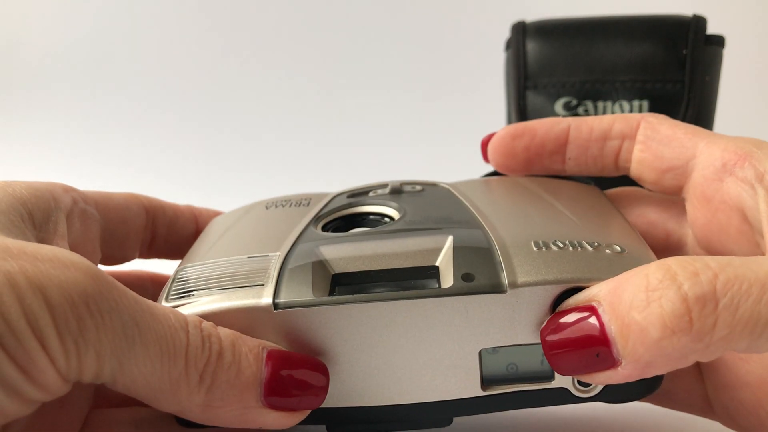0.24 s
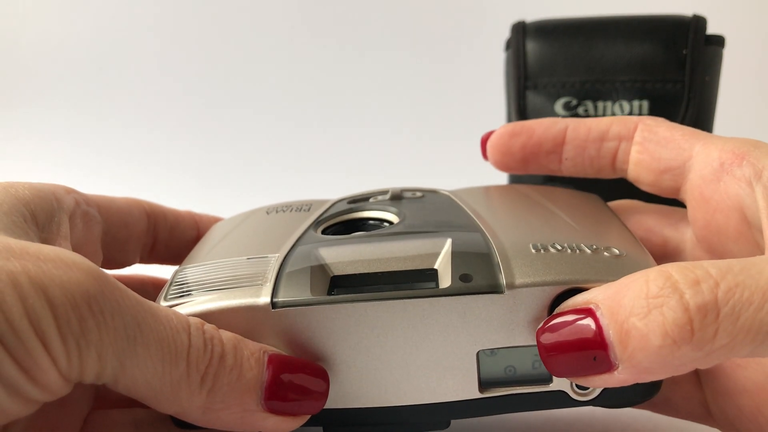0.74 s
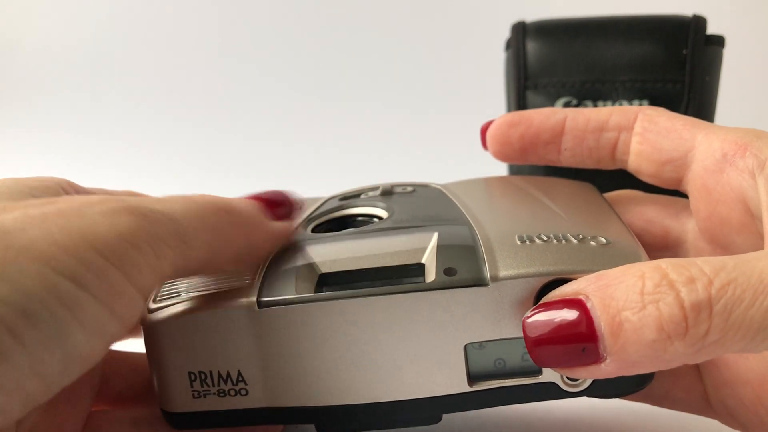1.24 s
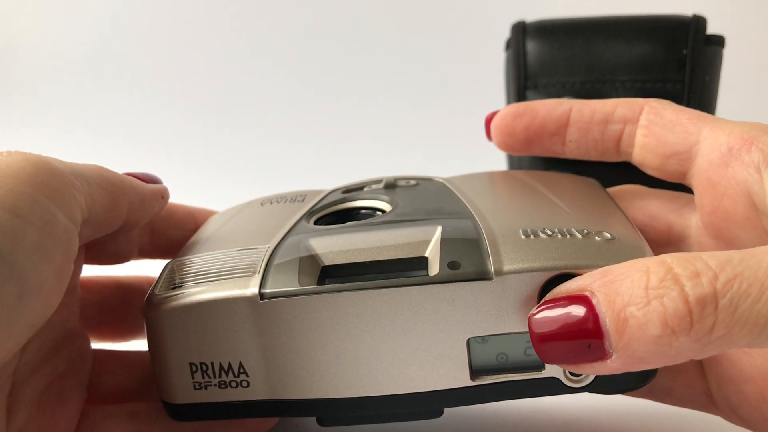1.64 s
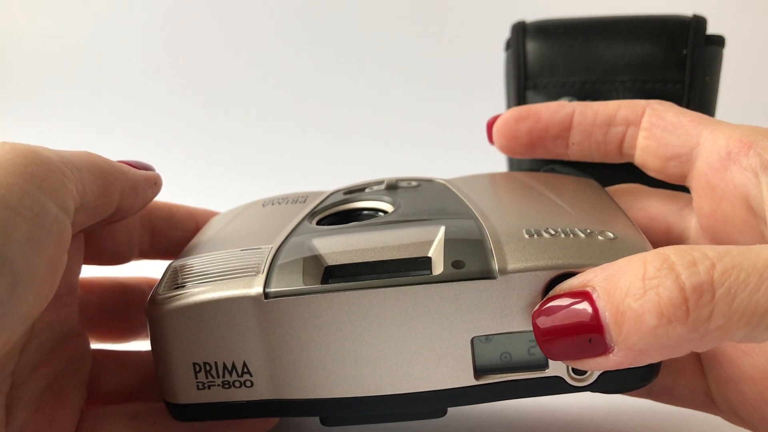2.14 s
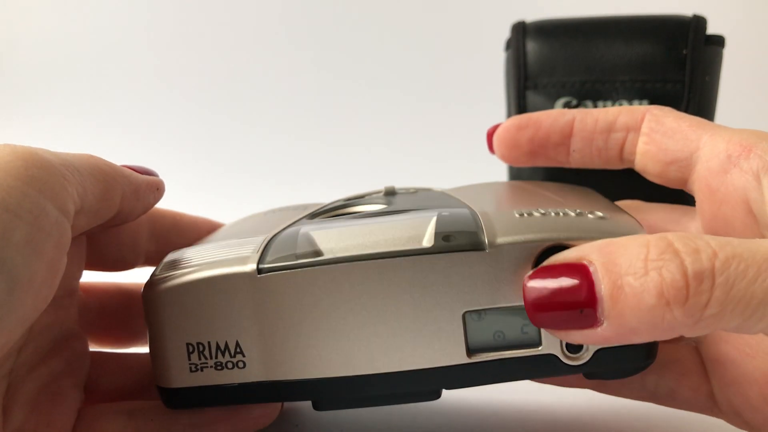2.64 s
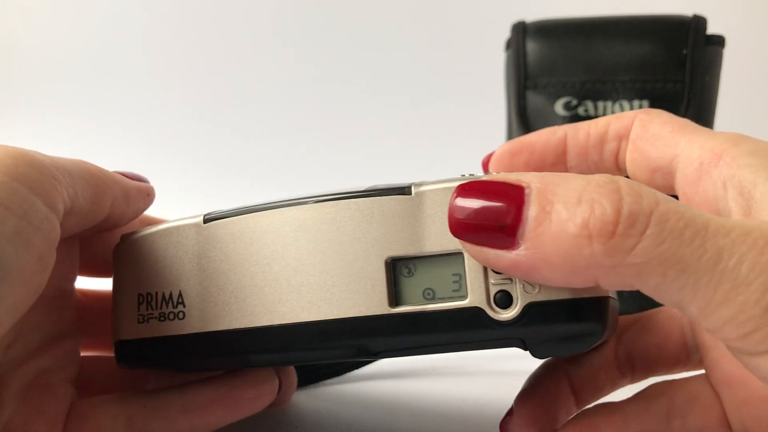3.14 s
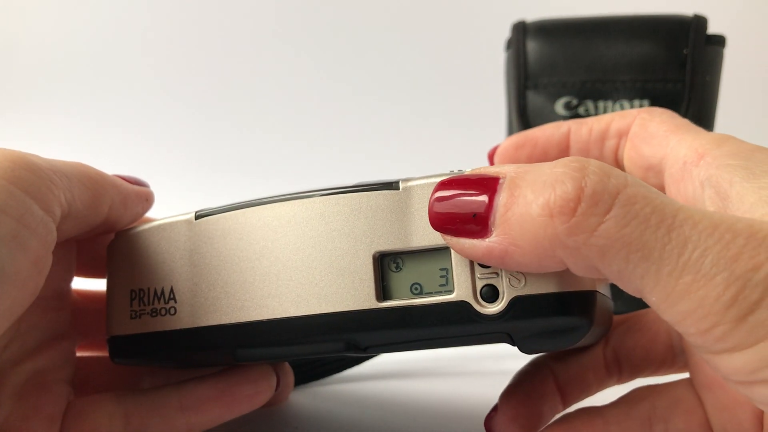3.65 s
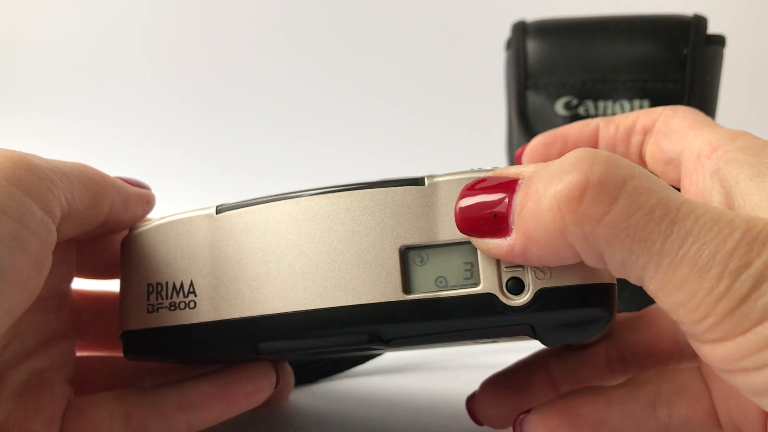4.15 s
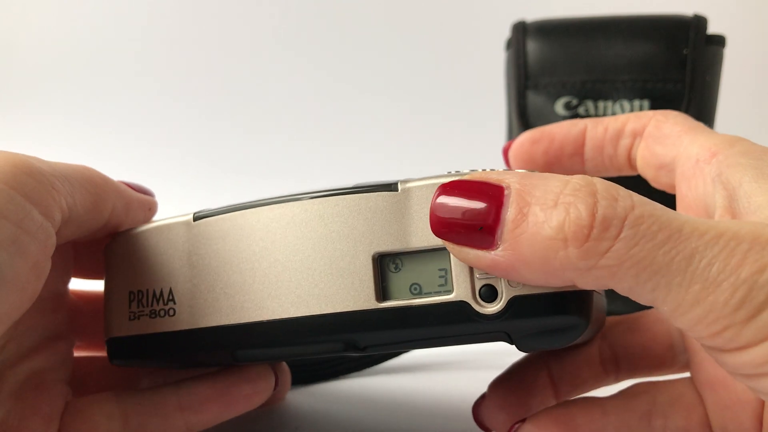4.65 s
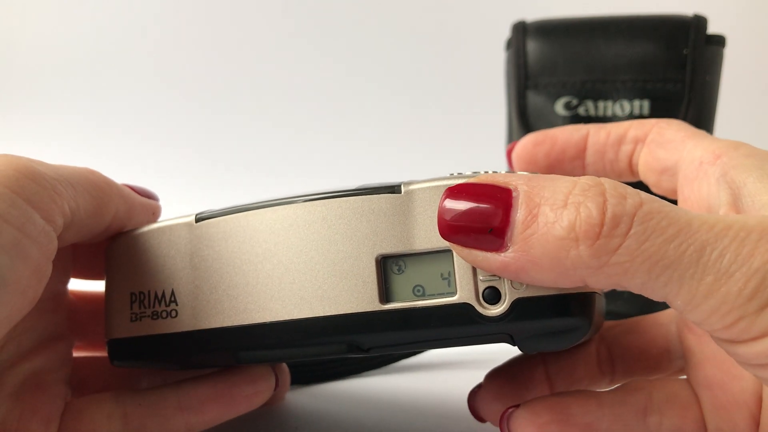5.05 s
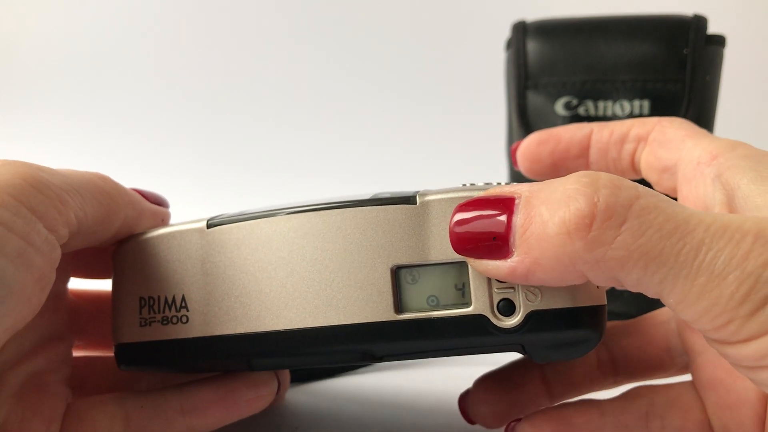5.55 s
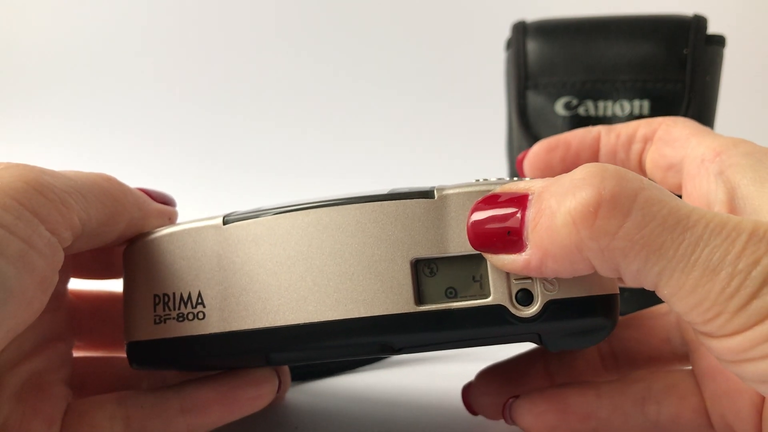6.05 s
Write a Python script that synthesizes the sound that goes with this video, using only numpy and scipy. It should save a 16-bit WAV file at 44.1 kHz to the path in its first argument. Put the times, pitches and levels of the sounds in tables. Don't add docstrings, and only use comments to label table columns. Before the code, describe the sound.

Close-miked handling of a small plastic film camera in a quiet room with a faint short echo. At 0.17 s the shutter snaps, a hard double click about 35 ms apart; from 0.33 to 0.83 s a small geared motor whirs, buzzy and fizzy with a whine around 2.4 kHz, then brakes abruptly. Light taps and a quick finger rub come at 1.05-1.4 s, over very faint thin ticking about ten times a second. The second shot is at 2.49 s, its clearer whine running 2.64-3.15 s, ending in a tight scrape and faint metallic ring. A soft slide follows near 3.3 s. A button tap at 4.23 s precedes the third shot at 4.31 s, winding 4.44-4.95 s. More ticking, taps at 5.62 and 6.01 s, then the last shot at 6.09 s and a duller whir from 6.24 s, cut short. Low room rumble, distant hums and hiss continue throughout.

```python
import sys
import numpy as np
from scipy import signal
from scipy.fft import rfft, irfft, next_fast_len
from scipy.io import wavfile
from scipy.ndimage import map_coordinates

SR = 44100
rng = np.random.default_rng(int(sys.argv[2]) if len(sys.argv) > 2 else 0)


def nominal_scale(level):
    x = np.asarray(level, float) / 20
    return 10 ** x


def wrap_up_sound(samples):
    columns = np.atleast_2d(samples).T
    tamed = np.clip(columns, -1, 1)
    steps = np.round(tamed * 32767).astype(np.int16)
    wavfile.write(sys.argv[1], SR, steps)


N = 277389
T = np.arange(N) / SR

# [f/Hz, level per Hz/dB]
FIZZ_COLOURS = [
    [(4000, -44), (6800, -2.5), (8110, -8), (9050, -4.5), (10100, -10.5), (11100, -6.5), (11700, -2),
     (12300, 5.5), (13400, -4.5), (15100, -1.5), (15800, -15)],
    [(4000, -29), (6800, -9.5), (7590, -8.5), (8230, -8.5), (8490, -2.5), (8990, -1), (10100, -8.5),
     (10900, -5.5), (11600, -8), (12600, 2), (14000, -2), (15000, -3.5), (15800, -15)],
    [(4000, -45.5), (6800, -1), (7560, 1.5), (8430, -3), (9640, 1.5), (10300, -4.5), (11100, 7), (11700, 1),
     (11900, -2.5), (13200, 8.5), (14000, 7.5), (15000, 9.5), (15800, -9)],
    [(4000, -29), (6800, -3), (8050, -5), (10300, -6), (10900, -2), (14200, -0.5), (15800, -2)],
]
# [f/Hz, level per Hz/dB]
SNAP_COLOUR = [(2940, -37.5), (5000, -3), (5400, 1), (6940, 1.5), (7820, 1), (8490, 6), (10800, 0),
               (12700, 2), (14200, 7.5), (15800, -7.5)]


def unit(x):
    return x / np.sqrt(np.mean(x ** 2) + 1e-20)


def along(points, hz):
    f, v = np.transpose(points)
    return np.interp(np.log(hz + 1), np.log(f + 1), v)


def wobble(rate, t=T):
    return map_coordinates(rng.standard_normal(int(t[-1] * rate) + 4), [t * rate])


def coloured(x, spectrum):
    gain = nominal_scale(along(spectrum, np.fft.rfftfreq(4096, 1 / SR)))
    cepstrum = irfft(np.log(gain + 1e-6))
    cepstrum[1:2048] *= 2
    cepstrum[2049:] = 0
    response = irfft(np.exp(rfft(cepstrum)))
    return signal.fftconvolve(x, response / np.linalg.norm(response))[:len(x)]


def noise(spectrum):
    return unit(coloured(rng.standard_normal(N), spectrum))


def resonant(x, hz, width):
    return signal.lfilter(*signal.iirpeak(hz, hz / width, SR), x)


def add(track, s, burst):
    part = track[round(s * SR):][:len(burst)]
    part += burst[:len(part)]


def rattle(db, t60, rise):
    t = T[:SR // 10]
    return nominal_scale(db - 60 * t / max(t60, .002)) * (1 - np.exp(-t / rise)) * rng.standard_normal(len(t))


def winding(start, spin, stop, full_hz, creep, slack, gear_db, fizz_db, whine_db, teeth_db, gears, fizz):
    # [multiple of shaft speed, level under the gear noise/dB]
    other_teeth = [(6, -29), (8, -32), (9, -19), (10, -18), (11, -25), (12, -20), (14, -34), (15, -23),
                   (17, -29), (18, -22), (20, -25), (21, -27), (24, -16.5), (28, -27), (31, -26), (36, -14),
                   (41, -25), (42, -14), (43, -21), (45, -23), (48, -23), (54, -14.5), (60, -22), (61, -23),
                   (66, -19), (69, -20), (70, -20)]
    swells = [(1, .3), (2, .14), (3, .2), (6, .1)]
    # [f/Hz, width/Hz, level/dB]
    housing = [(3484, 120, -0.5), (4212, 540, 2.5), (5691, 400, 1.5), (6215, 250, 4.5)]
    whine_multiple = 30
    t = T[:min(round((stop - start + .06) * SR), N - round(start * SR))]
    clock = start + t
    braked = np.maximum(clock - stop, 0)
    coast_s, bite_s, stall_db_per_s = 0.034, 0.0148, 556.5
    pace = (1 - np.exp(-t / spin)) * np.exp(-braked / coast_s)
    bite = 1 - np.exp(-(np.maximum(t - slack, 0) / bite_s) ** 2)
    strain_db = 3 * np.exp(-np.abs(clock - stop) / 0.0085)
    level = bite * pace ** 0.24 * nominal_scale(gear_db - stall_db_per_s * braked)
    shaft_hz = (full_hz + creep * (t - .35)) / whine_multiple
    turn = 2 * np.pi * np.cumsum(pace * shaft_hz) / SR

    def shell_db(k):
        return 0.45 * (along(gears, k * pace * shaft_hz) - along(gears, k * shaft_hz))

    def tone(k, db, drift):
        loudness = nominal_scale(db + 0.98 * wobble(15.51, t))
        return loudness * np.sin(k * turn + drift * wobble(29.5, t) + rng.uniform(0, 2 * np.pi))

    def grit():
        throb = sum(depth * np.cos(k * turn + .5 * wobble(15.5, t) + k) for k, depth in swells)
        return (1 + 0.602 * pace * throb) * nominal_scale(1.24 * wobble(900, t)) * rng.standard_normal(len(t))

    teeth = [(k, db + teeth_db) for k, db in other_teeth] + [(whine_multiple, whine_db)]
    tones = sum(tone(k, db + shell_db(k), .1 + k / 130) for k, db in teeth)
    whine = np.sqrt(2) * pace ** 2.7 * tones
    strikes = sum(tone(k, rng.normal(-20, 2), 1.1) for k in np.arange(78, 196, 6))
    rasp = coloured(grit(), gears)
    low = unit(rasp + sum(nominal_scale(db) * resonant(rasp, hz, width) for hz, width, db in housing))
    sizzle = grit() + pace * strikes
    tilt_s, tilt_takes_s, tilt_db = 3.02, 0.099, -0.5
    tipped = np.clip((clock - tilt_s) / tilt_takes_s, 0, 1) * (start < tilt_s)
    high = np.sqrt(1 - tipped) * unit(coloured(sizzle, fizz))
    high += tipped * nominal_scale(tilt_db) * unit(coloured(sizzle, FIZZ_COLOURS[2]))
    return level * (whine + nominal_scale(strain_db) * (nominal_scale(-2.0) * low + nominal_scale(fizz_db) * pace ** 1.67 * high))


def winder():
    # [start t/s, spin-up/s, brake t/s, full-speed whine f/Hz, its creep/Hz per s]
    runs = [
        (.325, 0.0442, 0.8304, 2423, 32),
        (2.643, 0.0401, 3.1547, 2412, -8.5),
        (4.444, .047, 4.955, 2438, 12),
        (6.235, 0.0408, 6.627, 2444, 4),
    ]
    # [slack before the gears bite/s, gear noise level/dB,
    # then over it: fizz/dB, whine/dB, other teeth/dB]
    heard_runs = [
        (0.0088, -35, -2.5, -8.5, 0),
        (0.0071, -35, -2, -5, 0.59),
        (0.01734, -34.5, -1.66, -5, 0.22),
        (0.00597, -35.5, -2, -19, -3.52),
    ]
    # [f/Hz, level per Hz/dB]
    gear_colours = [
        [(220, -62), (380, -25), (721, 2), (968, -12), (1040, -7), (1370, -9.5), (1910, -5), (2100, -5),
         (2380, -2.5), (2560, -2.5), (3440, -1), (5100, -7.5), (5490, -5.5), (7200, -16.5), (9360, -46.5),
         (15800, -120)],
        [(220, -63.5), (380, -41), (474, -25), (536, -12.5), (795, -12), (1120, -14.5), (1880, -10),
         (2050, -14), (2350, -5.5), (2590, -12), (3400, -7), (3700, -11), (5490, -13), (7200, -21.5),
         (9360, -48), (15800, -120)],
        [(220, -56), (380, -29.5), (480, -19.5), (669, -11.5), (730, -13.5), (1060, -16.5), (1980, -10),
         (2160, -18), (2380, -8.5), (2590, -10), (4040, -9.5), (5100, -16), (5560, -11.5), (7200, -23),
         (9360, -44), (15800, -120)],
        [(210, -47.5), (350, -40.5), (588, -2), (927, -9), (1210, -2), (1980, -6.5), (3460, -3), (7200, -25.5),
         (9360, -59.5), (15800, -120)],
    ]
    # [t/s, level/dB, f/Hz, spring level/dB]
    stops = [
        (0.772, -39, 4200, -77),
        (3.102, -31.5, 4030, -57),
        (4.905, -39, 4200, -66),
    ]
    track = np.zeros(N)
    for run, heard, gears, fizz in zip(runs, heard_runs, gear_colours, FIZZ_COLOURS):
        add(track, run[0], winding(*run, *heard, gears, fizz))
    t = T[:SR // 2]
    for s, db, hz, spring_db in stops:
        scrape = rattle(db + 14, 0.5, rise=.02)[:round(.065 * SR)]
        add(track, s, resonant(scrape, hz, 300))
        add(track, s + .05, nominal_scale(spring_db - 60 * t / 0.445) * np.sin(2 * np.pi * 3730 * t))
    return track


def shutter():
    # [t/s, opening level/dB, exposure/s, closing level/dB]
    shots = [
        (0.1733, 1, 0.0355, 0.5),
        (2.493, -0.3, 0.037, 0.5),
        (4.3058, -0.5, .0360, -1),
        (6.0868, -0.5, 0.0344, 1),
    ]
    # [t after the stroke starts/s, knock level/dB, snap over knock/dB, t60/s]
    open_stroke = [
        (-.002, -57, -4.5, .03),
        (0, -17.5, 3, 0.016),
        (.004, -28.5, -3.5, 0.01),
        (.0085, -32.5, 3, .016),
        (.013, -42, -3.5, .02),
    ]
    close_stroke = [
        (-.004, -43, 1.5, .02),
        (0, -24, -6.5, 0.011),
        (.0042, -30.5, 1, 0.019),
        (.011, -34.5, -4, .035),
        (.02, -45.5, -10, .04),
    ]
    # [f/Hz, level per Hz/dB]
    opening_colour = [(180, -60.5), (300, -33.5), (610, -17.5), (926, -15), (1300, -3.5), (1690, -12),
                      (2440, -0.5), (3190, -4), (4230, -1.5), (4950, -16), (5600, -7), (7280, -36),
                      (12300, -120)]
    closing_colour = [(180, -62), (300, -28.5), (402, -29), (914, -11.5), (1170, -11), (1510, -3.5),
                      (1770, -6.5), (2720, -6.5), (2960, 2), (4440, -19), (5600, -16), (7280, -45),
                      (12300, -120)]
    # [f/Hz, width/Hz, level/dB]
    shell_modes = [(1499, 68, -3.5), (3069.3, 96, -4.5), (4170, 73, -10.5), (2400, 170, -11)]
    opens, closes, snaps, whirs = np.zeros((4, N))
    for s, open_db, exposure, close_db in shots:
        strokes = ((opens, s, open_db, open_stroke), (closes, s + exposure, close_db, close_stroke))
        for knocks, at, blow_db, stroke in strokes:
            for late, db, snap_db, t60 in stroke:
                add(knocks, at + late, rattle(blow_db + db, t60, rise=0.0001))
                add(snaps, at + late, rattle(blow_db + db + snap_db, 0.69 * t60, rise=0.000095))
        add(whirs, s, rattle(-42.0, 0.2, rise=.003))
        add(snaps, s, rattle(-43.5, 0.22, rise=0.0034))
    blows = closes + .4 * opens
    ring = sum(nominal_scale(db + 11) * resonant(blows, hz, width) for hz, width, db in shell_modes)
    knocking = coloured(opens + whirs, opening_colour) + coloured(closes, closing_colour)
    return knocking + ring + coloured(snaps, SNAP_COLOUR)


def fingers():
    # [t/s, level/dB, f/Hz, width/Hz, snap over tap/dB]
    shell_taps = [(1.046, -43, 1100, 895, -29), (1.110, -48.5, 1690, 1752, -18.5),
                  (1.301, -43.5, 1276, 800, -21), (1.348, -32.5, 2330, 1720, -21),
                  (1.402, -46, 1200, 1200, -24), (3.438, -51, 1000, 400, -29.5),
                  (4.230, -33.5, 2097, 2705, -16), (4.2825, -52.5, 2618, 2000, -15.5),
                  (4.4584, -37.5, 1880, 2000, -19), (5.624, -38.5, 845, 345, -21),
                  (6.014, -35, 1933, 2600, -17.5)]
    # [t/s, level/dB]
    latches = [
        (.150, -59),
        (3.461, -63.5),
        (4.2825, -55),
        (4.296, -56.5),
        (6.066, -60),
    ]
    # [t/s, level/dB, first f/Hz, t60/s]
    jolts = [
        (4.304, -46.5, 210, 0.077),
        (4.228, -54, 470, 0.053),
        (2.492, -68, 200, 0.058),
        (5.2, -59, 160, 0.12),
        (.172, -65.5, 220, 0.047),
    ]
    # [peak t/s, level/dB, rise/s, fall/s]
    rubs = [
        (1.114, -68, 0.041, 0.0442),
        (1.378, -52, 0.0345, 0.018),
        (3.29, -65.5, .13, 0.162),
    ]
    # [f/Hz, level per Hz/dB]
    skin_colour = [(470, -40.5), (800, -15), (1110, -16), (1950, -5.5), (4740, -11), (5440, -6.5),
                   (7450, -8.5), (9450, -7), (16000, -4)]
    taps, snaps, t = np.zeros(N), np.zeros(N), T[:SR // 10]
    for s, db, hz, width, snap_db in shell_taps:
        t60 = .034 / (1 + width / 2900)
        tap = resonant(rattle(db + 4.5, t60, rise=0.00017), hz, width)
        add(taps, s, resonant(tap, hz, 2 * width))
        add(snaps, s, rattle(db + snap_db - 9.5, 0.14 * t60, rise=0.000197))
    for s, db in latches:
        add(snaps, s, rattle(db, 0.0087, rise=.0002))
    for s, db, hz, t60 in jolts:
        add(taps, s, nominal_scale(db - 60 * t / t60) * np.sin(2 * np.pi * hz * t / (1 + t / 0.019)))
    slide = np.zeros(N)
    for s, db, rise, fall in rubs:
        from_peak = (T - s) / np.where(T < s, rise, fall)
        slide += nominal_scale(db - 12 * from_peak ** 2)
    return taps + coloured(snaps, SNAP_COLOUR) + slide * nominal_scale(1.1 * wobble(150)) * noise(skin_colour)


def charger():
    # [first t/s, last t/s, level/dB]
    ticking = [
        (1.0188, 2.42, -62),
        (3.476, 4.2, -64.5),
        (5.113, 6.05, -63),
    ]
    # [from t/s, to t/s, level/dB]
    whispers = [
        (1.85, 2.48, -79.5),
        (5.3, 5.849, -81),
    ]
    tick_s = .1024
    ticks = np.zeros(N)
    for first, last, db in ticking:
        for s in np.arange(first, last, tick_s):
            add(ticks, s, rattle(db + 8.0 + rng.normal(0, 1), .004, rise=.0001))
    spells = sum(nominal_scale(db) * ((T > first) & (T < last)) for first, last, db in whispers)
    hiss = unit(resonant(resonant(rng.standard_normal(N), 13500, 4000), 13500, 5000))
    return resonant(ticks, 13000, 7000) + spells * hiss


def room(x):
    # [f/Hz, t60/s]
    decays = [(400, 0.5), (2000, 0.35), (5000, 0.44), (9000, 0.29), (14000, 0.26)]
    hz, t, z = signal.stft(rng.standard_normal(SR // 2), SR, nperseg=256)
    fading = nominal_scale(-60 * t / along(decays, hz)[:, None])
    tail = signal.istft(z * fading, SR, nperseg=256)[1]
    delayed = np.pad(x, (200, 0))
    return signal.fftconvolve(delayed, tail / np.linalg.norm(tail))[:N]


def air():
    # [t/s, level/dB]
    murmur = [(0, 0.5), (1.2, 1), (1.8, 0.38), (2.45, 1.5), (3.6, 0), (5.2, -0.5), (5.7, 2), (6.29, -0.5)]
    # [f/Hz, width/Hz, level/dB]
    appliance = [(251.7, 16, -78), (618.4, 19, -81.5), (151, 28, -78.5)]
    # [from t/s, to t/s, f/Hz, width/Hz, level/dB]
    drones = [
        (0.59, 1.394, 518, 3.9, -77),
        (-.4, 1.7, 178, 28, -75.5),
        (4.5, 5.0, 244, 6.9, -69.5),
    ]
    # [f/Hz, level per Hz/dB]
    rumble_colour = [(15, -37), (25, -5.5), (53, -2), (168, -7), (247, -1), (276, -23.5), (303, -6),
                     (344, -16.5), (370, -4), (398, -13.5), (544, -14.5), (630, -11.5), (730, -15.5),
                     (1290, -17), (2000, -26.5), (2600, -60), (4400, -120)]
    hiss_colour = [(880, -23.5), (1500, -7), (1740, -3.5), (2550, 1), (4780, -4.5), (6110, -3.5),
                   (7740, -6.5), (11500, -7), (12600, -2.5), (14000, -5), (15100, 0), (15700, -5)]
    swell_db = np.interp(T, *np.transpose(murmur))
    hums = sum(nominal_scale(db) * unit(resonant(rng.standard_normal(N), hz, width)) for hz, width, db in appliance)
    for first, last, hz, width, db in drones:
        passing = np.exp(-((2 * T - first - last) / (last - first)) ** 4)
        hums += nominal_scale(db) * passing * unit(resonant(rng.standard_normal(N), hz, width))
    rumble = nominal_scale(-70 + swell_db + 1.3 * wobble(6.7)) * noise(rumble_colour)
    hiss = nominal_scale(-76 + .6 * swell_db) * noise(hiss_colour)
    return rumble + hums + hiss


def scene():
    motor, clicks = winder(), shutter() + fingers()
    echo = nominal_scale(-21) * room(motor) + nominal_scale(-19.0) * room(clicks)
    return (motor + clicks + echo + charger() + air())[None]


def low_pass(x):
    return signal.sosfilt(signal.butter(12, 16990, fs=SR, output="sos"), x)


def record(dry):
    # [f/Hz, level/dB]
    mic_response = [(12, -40), (30, -16), (45, 0), (15750, 0), (15950, -35), (17000, -50)]
    size = next_fast_len(N + 8192)
    gain = nominal_scale(along(mic_response, np.fft.rfftfreq(size, 1 / SR)))
    heard = irfft(rfft(dry, size) * gain, size)[:, :N]
    return low_pass(heard)


dry = scene()
out = record(dry)
wrap_up_sound(out)
```